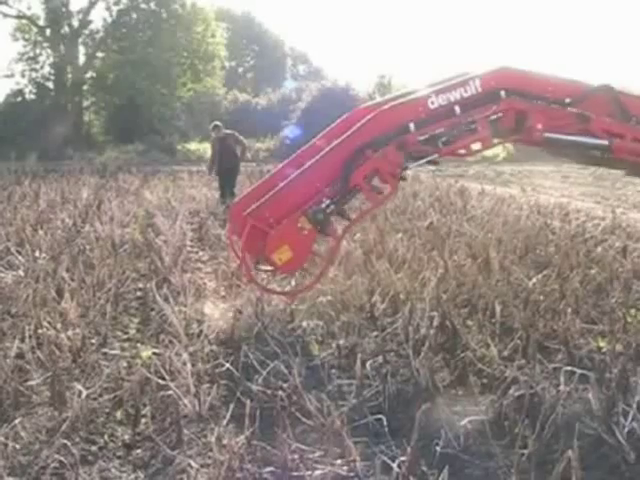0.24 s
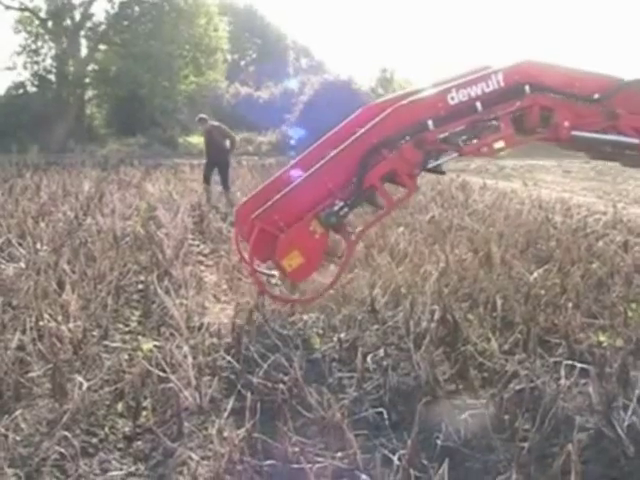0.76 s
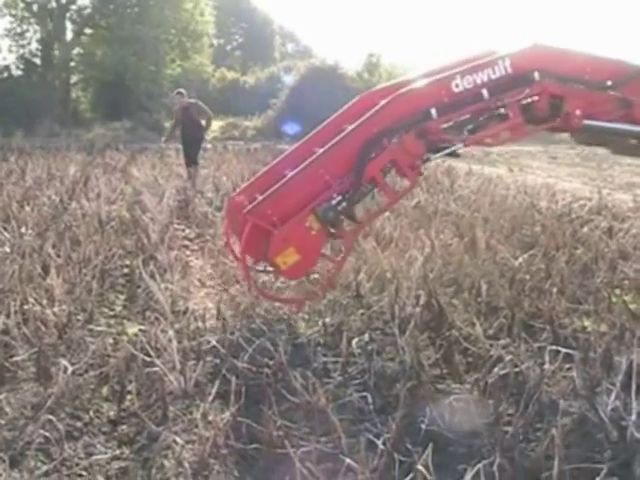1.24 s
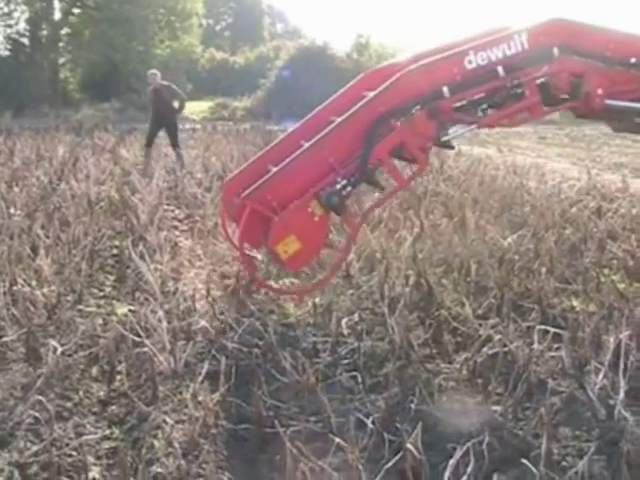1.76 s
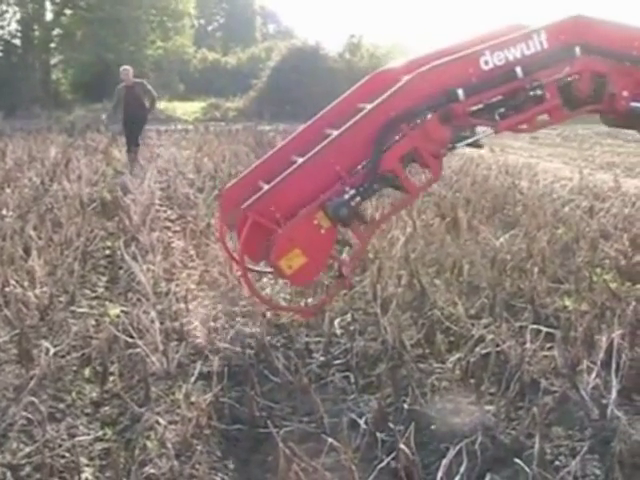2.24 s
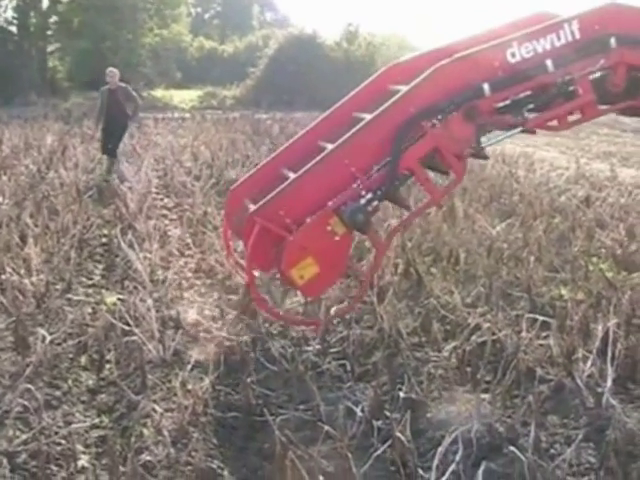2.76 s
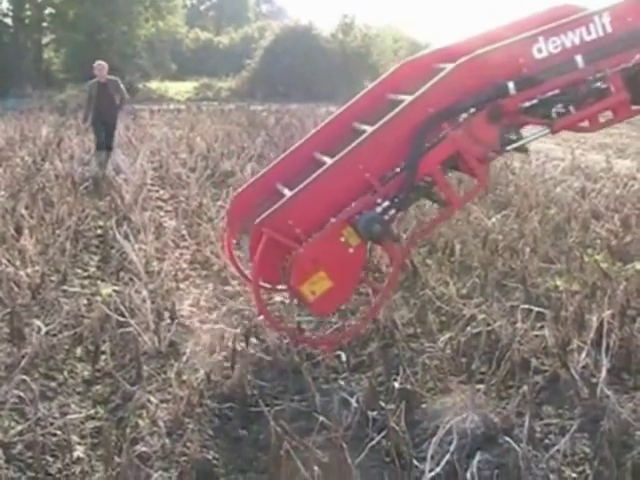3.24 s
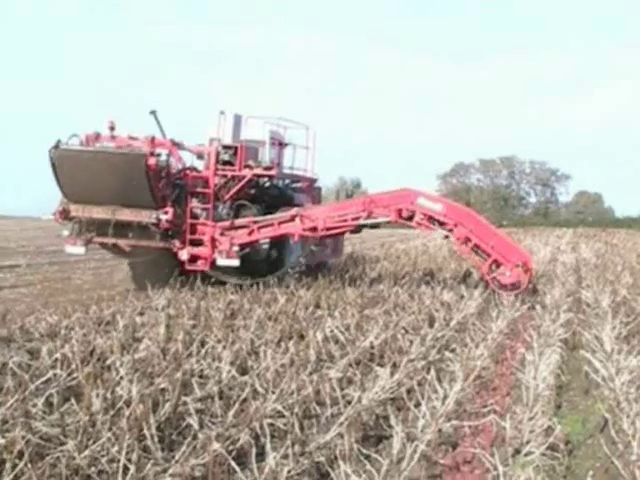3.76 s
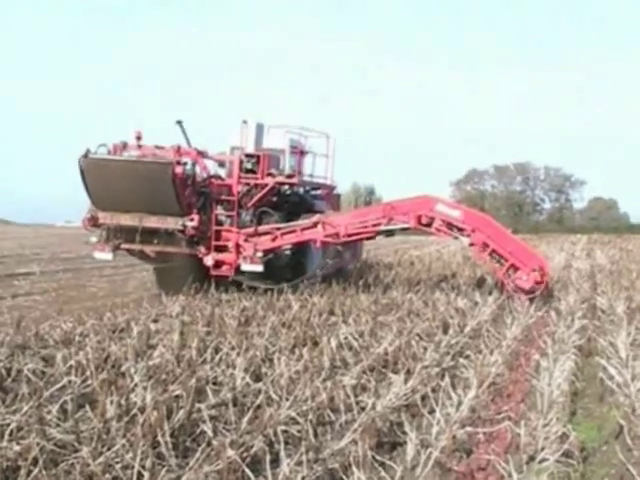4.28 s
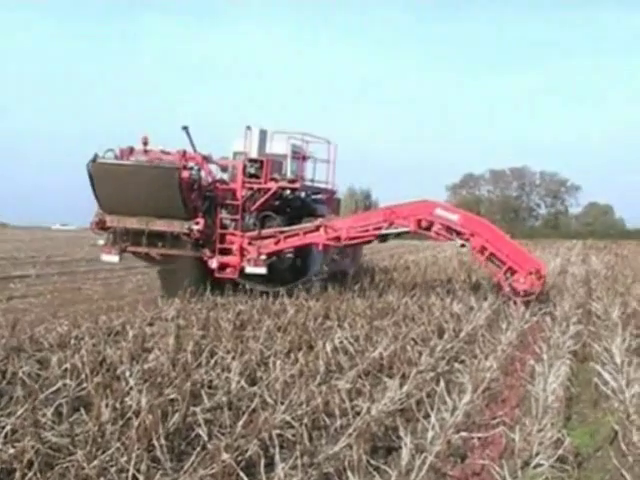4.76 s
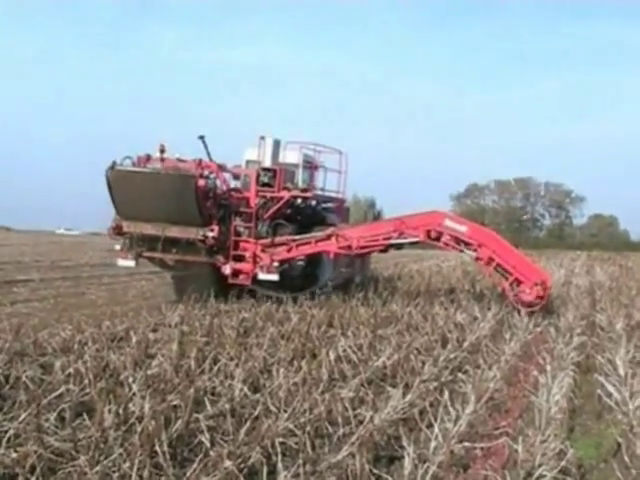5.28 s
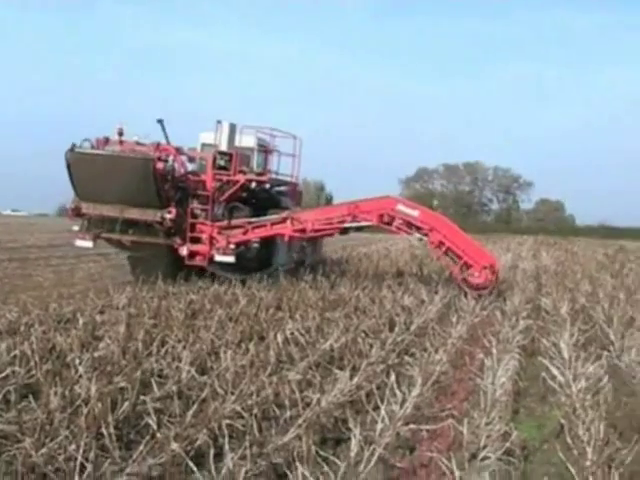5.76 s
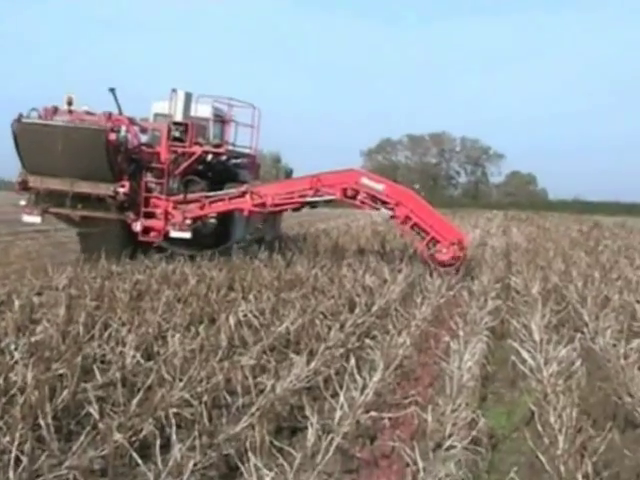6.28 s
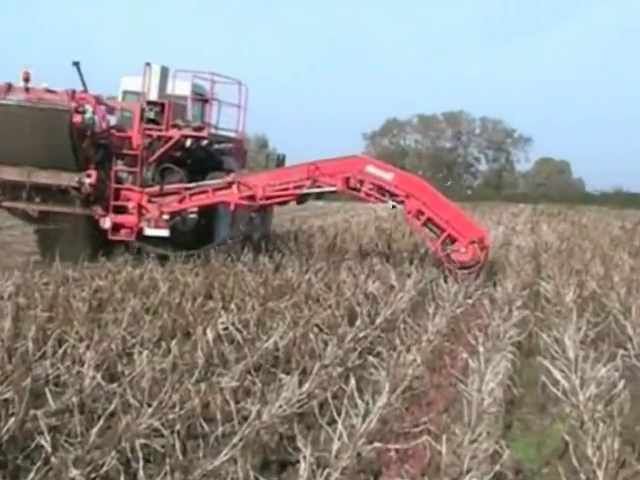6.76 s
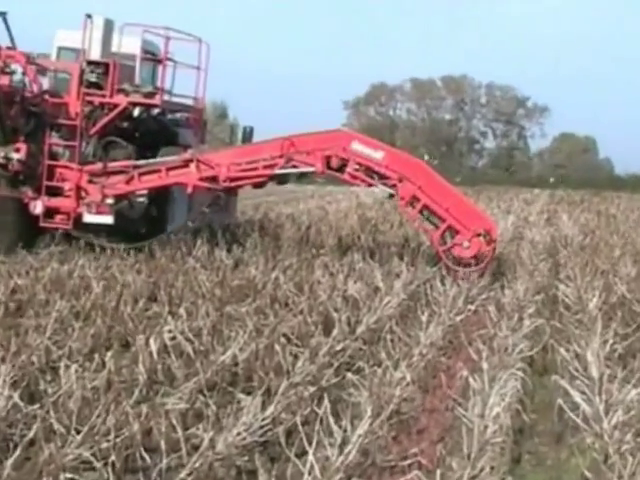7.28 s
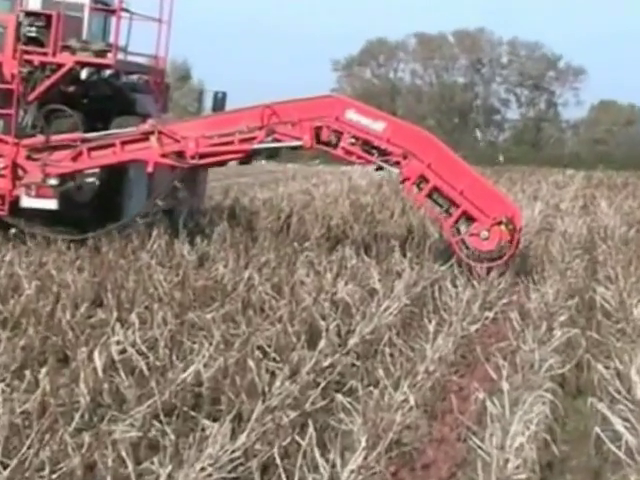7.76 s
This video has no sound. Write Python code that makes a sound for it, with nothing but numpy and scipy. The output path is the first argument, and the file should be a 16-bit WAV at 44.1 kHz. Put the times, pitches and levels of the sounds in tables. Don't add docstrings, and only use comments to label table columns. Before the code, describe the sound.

Loud harvester engine hum with whining gears, hiss and rattling chains, cutting suddenly to a second heavier drone as gusts thump the microphone.

```python
import sys
import numpy as np
from scipy import signal
from scipy.fft import rfft, irfft, next_fast_len
from scipy.io import wavfile

SR = 44100
rng = np.random.default_rng(int(sys.argv[2]) if len(sys.argv) > 2 else 0)


def voltage_ratio(level):
    return 10 ** (np.asarray(level, float) / 20)


def unload_audio(sound):
    columns = np.transpose(np.atleast_2d(sound))
    steps = np.round(np.clip(columns, -1, 1) * 32767)
    wavfile.write(sys.argv[1], SR, steps.astype(np.int16))


N = 353682


def in_time(rows):
    s, *columns = np.transpose(rows)
    return [np.interp(np.arange(N) / SR, s, column) for column in columns]


def at_hz(points, hz):
    point_hz, value = np.transpose(points)
    return np.interp(np.log(hz + 1), np.log(point_hz), value)


def rms_one(x):
    return x / np.sqrt(np.mean(x ** 2))


def drift(rate_hz):
    r = np.exp(-80 * np.pi * rate_hz / SR)
    noise = rng.standard_normal(N // 40 + 2002)
    slow = signal.lfilter([1], [1, -2 * r, r * r], noise)[2000:]
    return np.interp(np.arange(N) / 40, np.arange(len(slow)), rms_one(slow))


def swells(rows, edge_s):
    s = np.arange(N) / SR
    lift_db = np.zeros(N)
    for start, length, db in rows:
        inside_s = np.minimum(s - start, start + length - s)
        lift_db += db * np.clip(inside_s / edge_s + .5, 0, 1)
    return lift_db


def band(x, low_hz, high_hz):
    return signal.sosfilt(signal.butter(2, [low_hz, high_hz], "band", fs=SR, output="sos"), x)


def coloured(points, count):
    size = next_fast_len(N)
    gain = voltage_ratio(at_hz(points, np.fft.rfftfreq(size, 1 / SR)))
    return irfft(rfft(rng.standard_normal((count, size))) * gain, size)[:, :N]


def tone(turns, db):
    return np.sqrt(2) * voltage_ratio(db) * np.cos(2 * np.pi * turns)


BREEZE_DB, GUST_EDGE_S = (-47, -41), .04
# start in seconds, length in seconds, lift in dB.
WIND_GUSTS = [
    (4.93, 0.11, 7),
    (6.1, .38, 5),
    (7.0, .28, 9),
    (7.45, 0.14, 21.5),
    (7.7, .4, 5),
]
# centre in seconds, peak in dB, pitch in Hz, side it pushes (1 or -1).
WIND_THUMPS = [
    (6.149, -20, 110.2, 1),
    (7.201, -14, 89.97, -1),
    (7.476, -17, 109, -1),
    (7.4883, -8, 80, -1),
    (7.504, -16, 70.1, -1),
    (7.517, -8, 170, -1),
    (7.526, -6.5, 110.1, -1),
    (7.5545, -5, 110, 1),
    (7.565, -7, 70, 1),
    (7.649, -13, 90, -1),
]


def wind(far):
    level_db = BREEZE_DB[far] + swells(WIND_GUSTS, GUST_EDGE_S) + 5 * drift(25)
    out = voltage_ratio(level_db) * rms_one(band(rng.standard_normal(N), 25, 140))
    if far:
        for s, db, hz, side in WIND_THUMPS:
            near = np.arange(round(s * SR) - 1500, round(s * SR) + 1500)
            u = (np.pi * hz * (near / SR - s)) ** 2
            out[near] += side * voltage_ratio(db) * (1 - 2 * u) * np.exp(-u)
    return out


PUFF_DB = (1.6, 3.4)
PIPE_LAG = (-.05, -1.05)
MIDDLE_S = (1.8, 5.75)
SWELL_EDGE_S = 0.095
LAYER_EDGES_HZ = (40, 226, 905, 3230, 13000)
# frequency in Hz, level in dB per Hz.
DRUM_COLOUR = [
    [(40, -20), (60, -12.5), (80, -11.5), (115, -4.5), (165, 2.5), (230, -6)],
    [(40, -19), (60, -19.5), (80, -16.5), (115, -8), (165, 0.5), (230, -10)],
]
# frequency in Hz, level in dB per Hz.
CHAIN_COLOUR = [
    [(226, 1), (300, 1), (450, -7), (700, -5.5), (1000, -15.5), (1400, -15.5), (2100, -19.5), (3230, -21.5)],
    [(226, -2), (300, -4.5), (450, -0.5), (570, -6.5), (625, 1), (690, -3.5), (1000, -6), (1400, -8), (1750, -10.5), (2150, -9), (3230, -13)],
]
# frequency in Hz, level in dB per Hz.
STACK_COLOUR = [
    [(3230, 0), (3700, -1), (4300, 0), (5000, -2), (6000, -8), (7000, -17), (9000, -21), (11000, -28), (13000, -38)],
    [(3230, -6), (3620, -5.5), (3900, 1.2), (4150, 1), (4550, .3), (4900, -3.5), (5600, -7), (6500, -17), (7200, -24), (8000, -30), (9000, -42), (13000, -62)],
]
CYLINDER_HISS_DB = (-0.14, -1.1, 0.62, -1.6, -0.39, -1.4)
# near level in dB, far level in dB, fade in dB per second, share of the load, wander in dB.
LAYERS = [
    (-27, -26.5, 0.45, .01, 0),
    (-20, -25.5, -0.12, .05, 0.15),
    (-24, -25.5, -0.8, 0.067, -0.32),
    (-28, -26, 0.2, 0.9, -0.46),
]
# time in seconds, load in dB.
ENGINE_LOAD = [
    [(.14, 1), (1.45, -1), (1.6, 0.5), (3.48, -1.5)],
    [(3.65, 2), (3.7, 0.5), (3.9, 4), (4.25, 3.5), (4.45, 2), (5.25, 3.5), (5.45, -1.5), (5.9, -0.5), (6.4, 1.5), (7.0, -1.5), (7.28, -4.5), (7.48, -1.5), (7.62, -3), (8.02, -0.5)],
]
# start in seconds, length in seconds, lift in dB.
SOIL_LOADS = [
    (7.7, .4, 2.5),
]


def machinery(firings, far):
    together_db = 0.37 * drift(1.8) + 0.4 * drift(25)
    cycle = np.floor(firings + .5).astype(int)
    uneven_db = np.array(CYLINDER_HISS_DB)[cycle % 6] + 0.69 * rng.standard_normal(1000)[cycle]
    puff = (.5 + .5 * np.cos(2 * np.pi * firings + PIPE_LAG[far] / 2)) ** 2
    load_db, = in_time(ENGINE_LOAD[far])
    away_s = np.arange(N) / SR - MIDDLE_S[far]
    colours = (DRUM_COLOUR, CHAIN_COLOUR, CHAIN_COLOUR, STACK_COLOUR)
    out = np.zeros(N)
    for part, (*db, fade_db, share, wander_db) in enumerate(LAYERS):
        is_stack = part == 3
        level_db = db[far] + fade_db * away_s + share * load_db + wander_db * drift(2.5)
        if not is_stack:
            level_db += swells(SOIL_LOADS, SWELL_EDGE_S)
        low, high = LAYER_EDGES_HZ[part:part + 2]
        edges = np.geomspace(low, high, round(2 * np.log2(high / low)) + 1)
        noise = coloured(colours[part][far], count=2)
        bright_db = 0.25 * load_db * is_stack
        layer = np.zeros(N)
        for k in range(len(edges) - 1):
            band_db = together_db + k * bright_db + 0.48 * drift(8.9)
            layer += voltage_ratio(band_db) * band(noise[k % 2], *edges[k:k + 2])
        if is_stack:
            layer *= voltage_ratio(puff * (2 * PUFF_DB[far] + uneven_db))
        out += voltage_ratio(level_db) * rms_one(layer)
    return out


MESH_PER_FIRING, PUMP_PER_FIRING = 22.6, 4.246
MESH_DB, PUMP_DB = (-39, -43), (-36.5, -37.5)
FAN_HZ, FAN_DB = 83.3, (-34, -39)
BURST_EDGE_S = 0.028
MESH_SIDEBANDS_DB = (-15, -12.5, -14)
# multiple of the pump tone, near level in dB, far level in dB.
PUMP_HARMONICS = [(1, 1.5, 0), (2, -2, -3.5), (3, -8, -5), (4, -4.5, -9), (5, -11.5, -14), (6, -5, -16),
                  (7, -5, -12.5)]
# start in seconds, length in seconds, lift in dB.
GEAR_LOADS = [(.29, .16, 9.5), (.55, .16, 10), (.78, .3, 10.5), (1.12, 0.29, 5.5), (1.47, 0.19, 6.5),
              (1.75, .24, 9.5), (2.1, 0.27, 6.5), (2.48, .35, 10), (2.9, .12, 8.5), (3.15, .32, 8.5),
              (3.5, .52, 9.5), (4.42, .52, 6.5), (5.55, .9, 10.5), (6.5, .7, 6)]
# start in seconds, length in seconds, lift in dB.
PUMP_LOADS = [
    (.15, .4, 4.5),
    (1.45, 0.91, 1.5),
    (2.45, 1.0, 1.5),
    (4.4, 0.5, 3),
    (6.4, 0.99, 0),
    (7.68, .4, 5),
]


def whines(firings, far):
    mesh_db = MESH_DB[far] + swells(GEAR_LOADS, BURST_EDGE_S)
    pump_db = PUMP_DB[far] + swells(PUMP_LOADS, SWELL_EDGE_S)
    mesh = MESH_PER_FIRING * firings + 0.035 * drift(4)
    out = tone(mesh, mesh_db + 1.1 * drift(20))
    out += tone(FAN_HZ * np.arange(N) / SR, FAN_DB[far] + 1.9 * drift(2.4))
    for crank_turns, db in enumerate(MESH_SIDEBANDS_DB, 1):
        for way in (-1, 1):
            out += tone(mesh + way * crank_turns * firings / 3 + rng.random(), mesh_db + db)
    for k, *db in PUMP_HARMONICS:
        turns = k * PUMP_PER_FIRING * firings + 0.015 * k * drift(5)
        out += tone(turns, pump_db + db[far] + 3 * drift(1.5))
    return out


ROUGH_TURNS = (.05, .02)
ORDER_WANDER_DB = 0.5
# order, near then far level in dB over the firing tone, share of the stack's turning.
UPPER_ORDERS = [
    (1.5, -6, -21.5, .1),
    (2, 5, -1.95, 1.12),
    (3, -9, -12, 1.2),
]
# start in seconds, length in seconds, lift in dB.
UNEVEN_SWELLS = [
    (1.3, 1.1, 5),
    (5.7, 0.61, 2.5),
    (6.95, 0.25, 2),
    (7.7, .4, 6.5),
]


def exhaust(firings, level_db, facing_db, far):
    out = tone(8 / 3 * firings, -39 + 2.5 * drift(3))
    out += tone(firings, level_db + 0.46 * drift(17))
    for k, *db, share in UPPER_ORDERS:
        lag_turns = PIPE_LAG[far] / (2 * np.pi) + ROUGH_TURNS[far] * drift(8.4)
        order_db = level_db + db[far] + share * facing_db + 0.42 * drift(36)
        if k % 1 > 0:
            order_db += swells(UNEVEN_SWELLS, SWELL_EDGE_S)
        if k != 2:
            order_db += ORDER_WANDER_DB * drift(3.5)
        out += tone(k * firings + (k - 1) * lag_turns, order_db)
    return out


DIFFUSE_DB, PORT_HISS_DB, HISS_TOP_HZ = (-15, -21.5), (-53, -57.5), (8800, 10300)
# frequency in Hz, left over right in dB.
PORT_TILT = [
    [(90, -.5), (190, -3.3), (450, -6.4), (700, -4.2), (1000, -6), (1400, -4), (3600, -.8), (6600, 5.7), (8000, 4.5), (10000, 0)],
    [(90, 0), (190, -1), (450, -1.9), (1000, -2.2), (1400, -.7), (2000, -1.4), (5000, -.6), (8000, -3)],
]
# frequency in Hz, lead of the left in radians.
PORT_LEAD = [
    [(45, .45), (90, .38), (190, 0), (450, -.4), (800, -.05), (1400, -.1), (2800, -.58), (4200, -1.06), (6000, -1.3), (7200, -2.3), (9000, -3.1)],
    [(90, .1), (190, .1), (300, -.05), (1400, -.03), (2800, -.32), (4200, -.66), (6000, -1.16), (7200, -2.1), (8000, -2.5)],
]
PORT_OFFSET = [
    (.0077, .0056),
    (.0084, .0098),
]


def ports(x, far):
    size = next_fast_len(N)
    hz, spectrum = np.fft.rfftfreq(size, 1 / SR), rfft(x, size)
    half = voltage_ratio(at_hz(PORT_TILT[far], hz) / 2) * np.exp(.5j * at_hz(PORT_LEAD[far], hz))
    diffuse = np.clip(hz / 300, 0, 1) * voltage_ratio(DIFFUSE_DB[far])
    random_turns = np.repeat(rng.random(len(hz) // 40 + 1), 40)[:len(hz)]
    smeared = diffuse * spectrum * np.exp(2j * np.pi * random_turns)
    pair = irfft([spectrum * half + smeared, spectrum / half - smeared], size)[:, :N]
    hiss = rng.standard_normal((2, N))
    for _ in range(3):
        hiss = band(hiss, 7300, HISS_TOP_HZ[far])
    return pair + voltage_ratio(PORT_HISS_DB[far]) * rms_one(hiss) + np.array(PORT_OFFSET[far])[:, None]


AHEAD_DB, ASIDE_DB, PASS_S, PASS_LENGTH_S = (-34, -25), -10, 4.7, .6
# time in seconds, firings in Hz, exhaust in dB, stack turned to the listener in dB.
ENGINE_RUN = [
    [(0.14, 95.3, -27.5, 1), (0.6, 95.95, -26.5, -1.5), (1.6, 95.5, -27, -1), (2.4, 95.5, -23.5, -0.5), (2.65, 95.56, -26.5, -1), (3.2, 95.3, -25, 0.5), (3.48, 95.5, -25.5, -2)],
    [(3.5, 95, -20.5, -0.5), (3.95, 95.2, -20, -0.5), (4.2, 94, -20, 1.5), (4.75, 93.9, -18.5, 0), (5.1, 94.34, -18, 0.5), (5.6, 94.44, -17.5, -0.5), (6.1, 94.8, -16.5, -2), (6.7, 94.9, -17.5, -3), (7.05, 96.3, -15.5, -3), (7.45, 96.34, -18, -5), (8.02, 96.3, -18.5, -6.5)],
]


def position(far):
    firing_hz, level_db, facing_db = in_time(ENGINE_RUN[far])
    firings = np.cumsum(firing_hz) / SR
    field = exhaust(firings, level_db, facing_db, far) + whines(firings, far) + machinery(firings, far)
    aside = .5 + .5 * np.tanh((np.arange(N) / SR - PASS_S) / PASS_LENGTH_S)
    split_db = level_db + AHEAD_DB[far] + aside * (ASIDE_DB - AHEAD_DB[far])
    opposed = tone(firings + 0.23, split_db) + wind(far)
    return ports(field, far) + opposed * [[1], [-1]]


START_S, CUT_S = .1292, 3.4892
CUT_STEP_DB, CUT_SETTLE_S = -17, .012


def scene():
    s = np.arange(N) / SR
    step = -voltage_ratio(CUT_STEP_DB) * np.exp(-np.abs(s - CUT_S) / CUT_SETTLE_S)
    fade_in = np.clip((s - START_S) / .0002, 0, 1)
    return np.where(s < CUT_S, position(0), position(1) + step) * fade_in


LIMIT_DB, RECOVER_DB_PER_S, DUCK_S = -3, 11, 0.046


def gain_control(x):
    ramp_db = RECOVER_DB_PER_S * np.arange(N) / SR
    over_db = np.maximum(20 * np.log10(np.abs(x).max(axis=0) + 1e-9) - LIMIT_DB, 0)
    held_db = np.maximum.accumulate(over_db + ramp_db) - ramp_db
    r = np.exp(-1 / (DUCK_S * SR))
    return x * voltage_ratio(-signal.lfilter([1 - r], [1, -r], held_db))


def band_limit(x):
    return signal.sosfilt(signal.butter(12, 16000, fs=SR, output="sos"), x)


def record(dry):
    levelled = gain_control(dry)
    rounded = levelled / (1 + (np.abs(levelled) / 1.05) ** 6) ** (1 / 6)
    return band_limit(rounded)


dry = scene()
out = record(dry)
unload_audio(out)
```